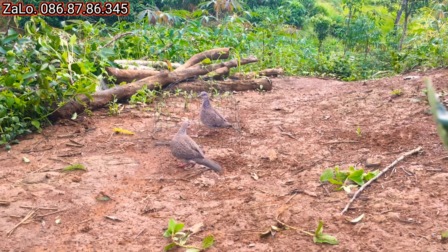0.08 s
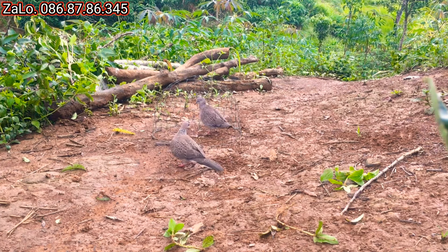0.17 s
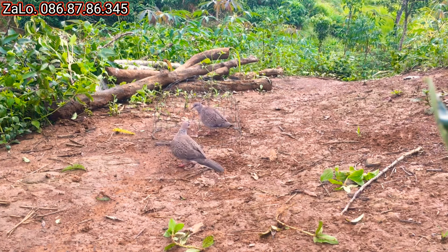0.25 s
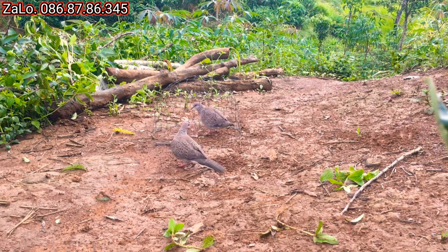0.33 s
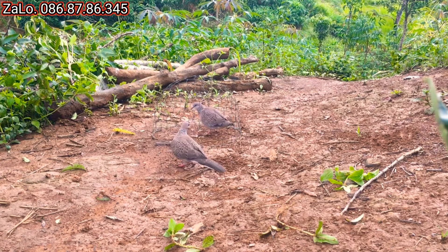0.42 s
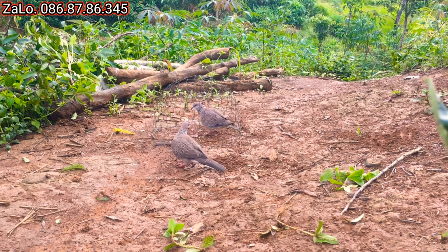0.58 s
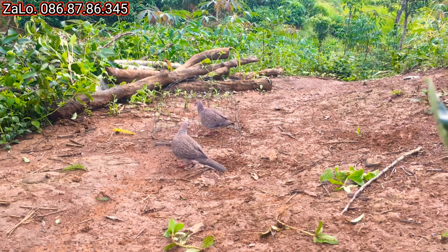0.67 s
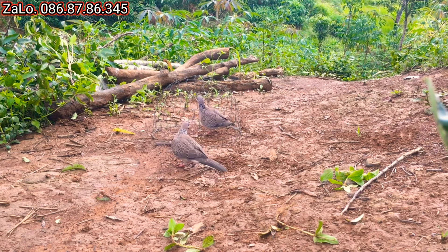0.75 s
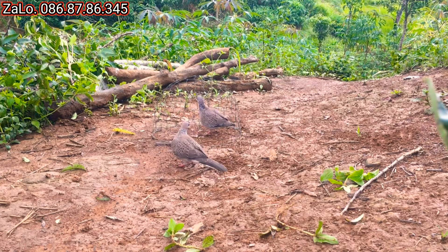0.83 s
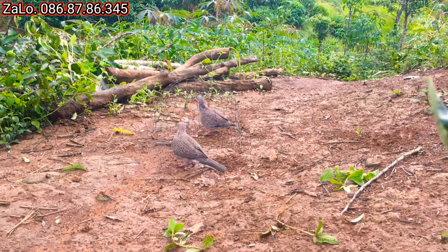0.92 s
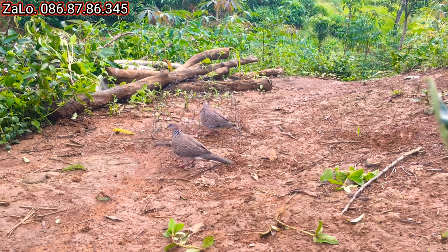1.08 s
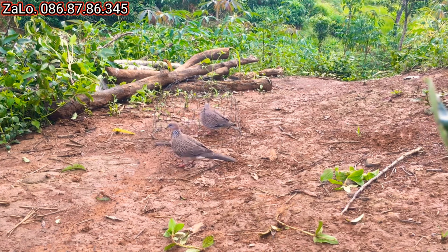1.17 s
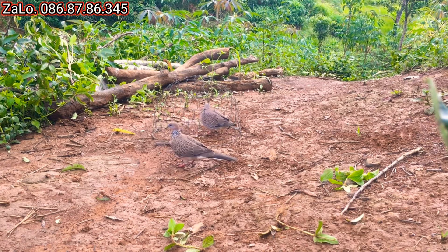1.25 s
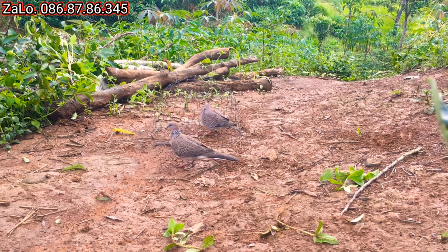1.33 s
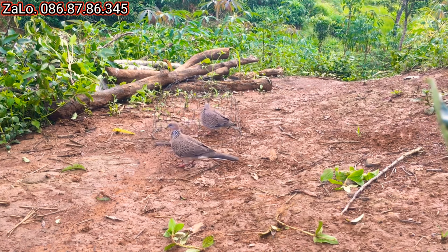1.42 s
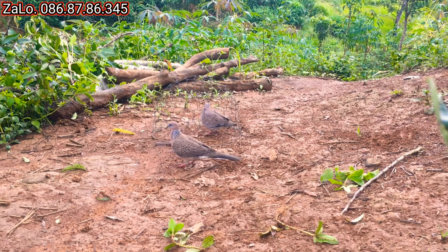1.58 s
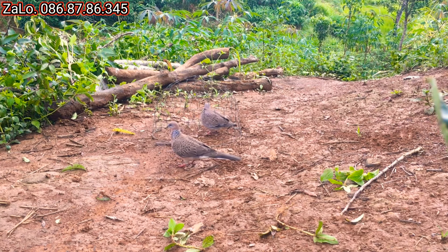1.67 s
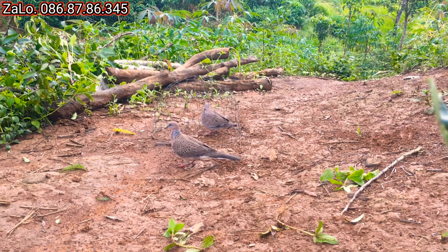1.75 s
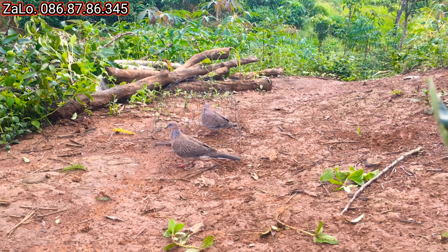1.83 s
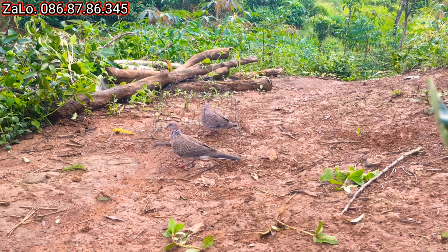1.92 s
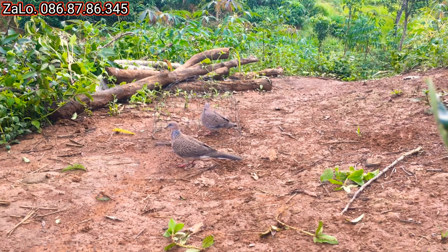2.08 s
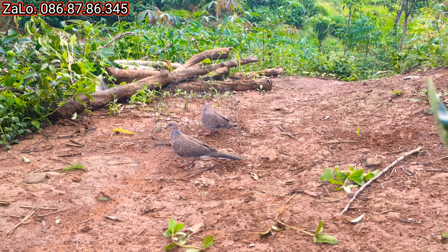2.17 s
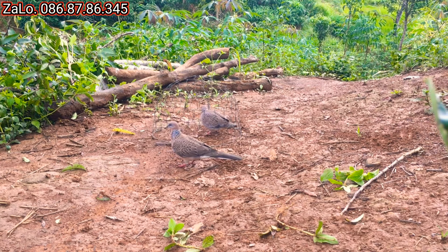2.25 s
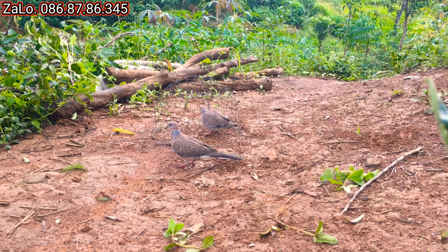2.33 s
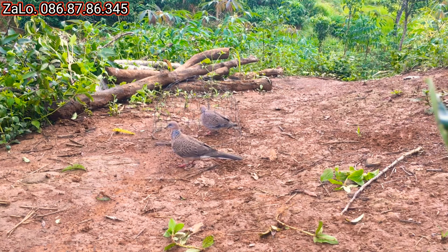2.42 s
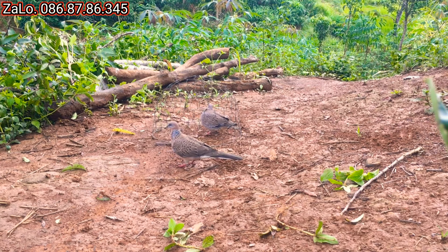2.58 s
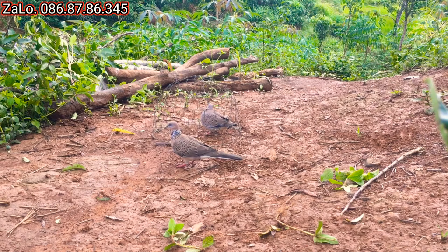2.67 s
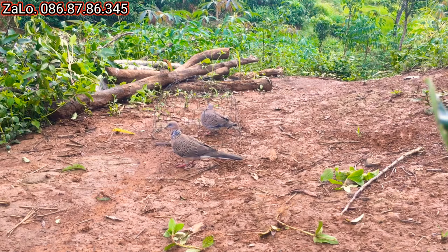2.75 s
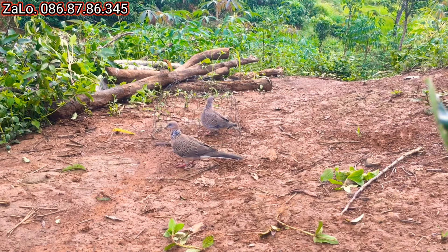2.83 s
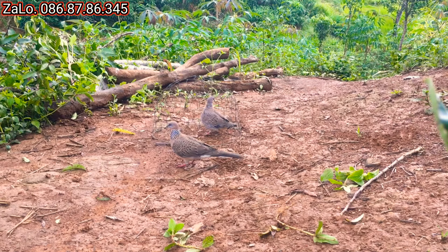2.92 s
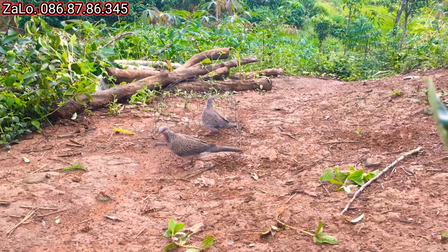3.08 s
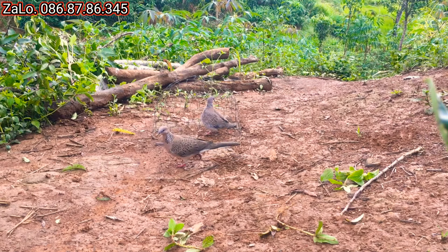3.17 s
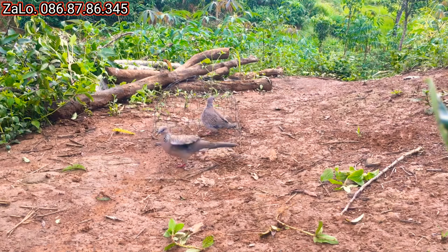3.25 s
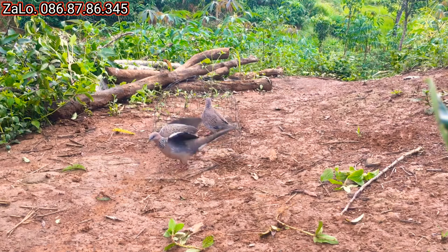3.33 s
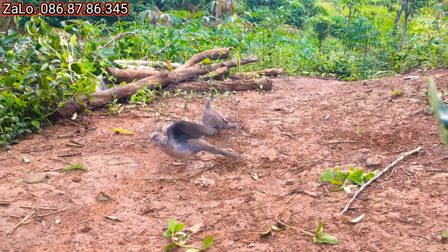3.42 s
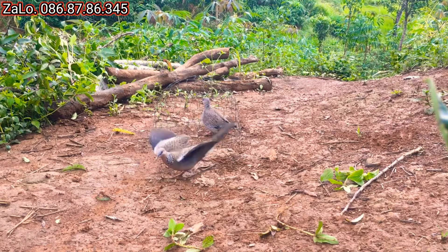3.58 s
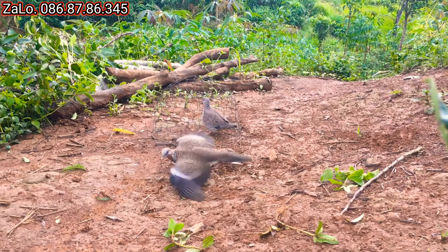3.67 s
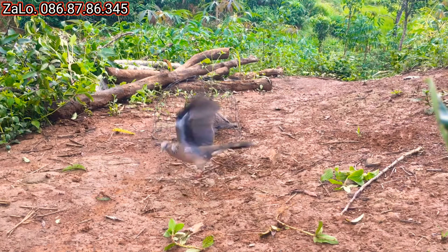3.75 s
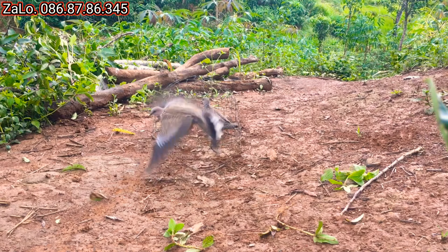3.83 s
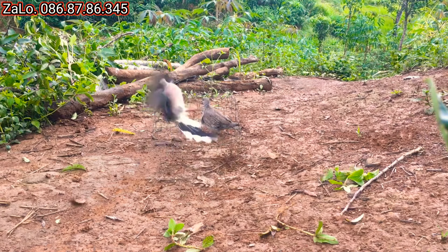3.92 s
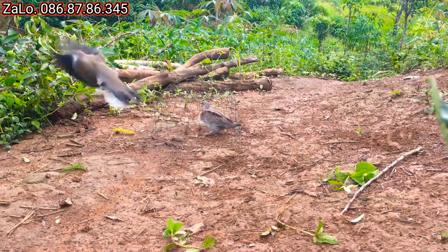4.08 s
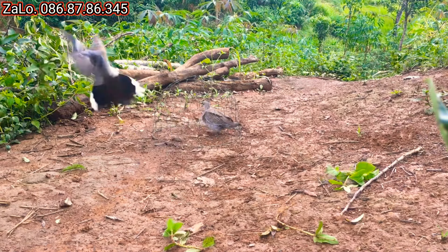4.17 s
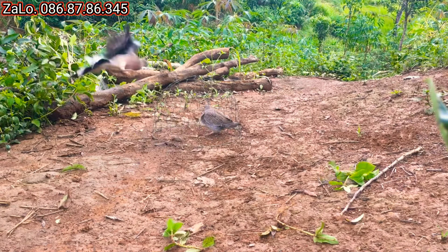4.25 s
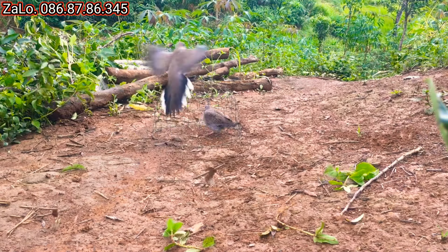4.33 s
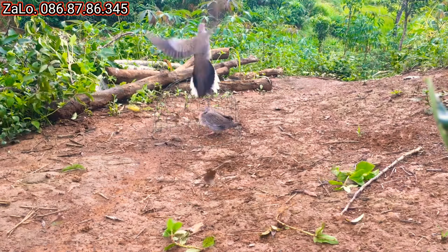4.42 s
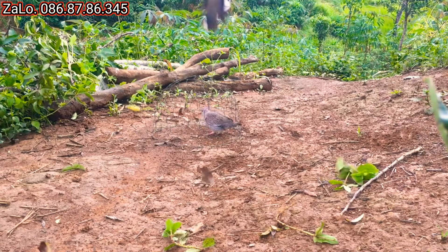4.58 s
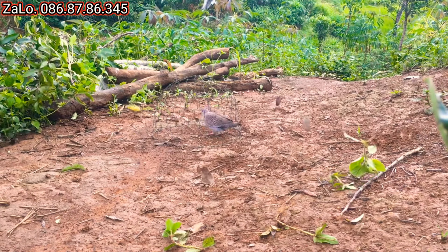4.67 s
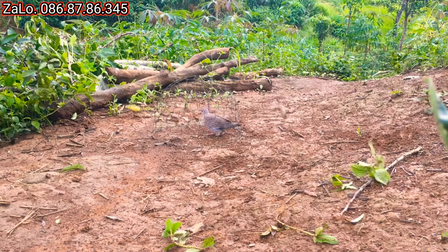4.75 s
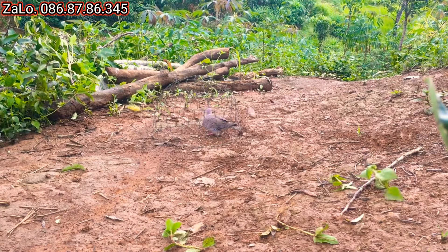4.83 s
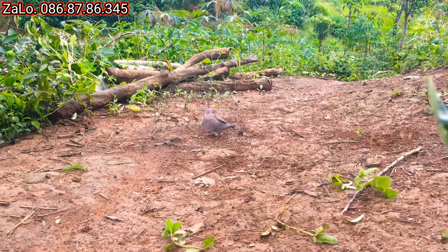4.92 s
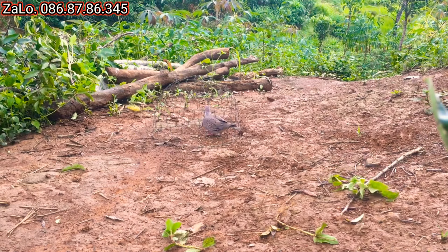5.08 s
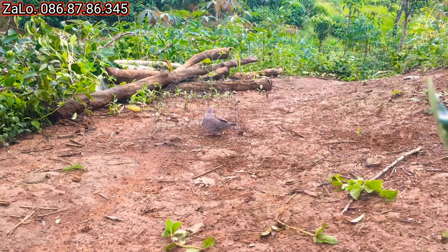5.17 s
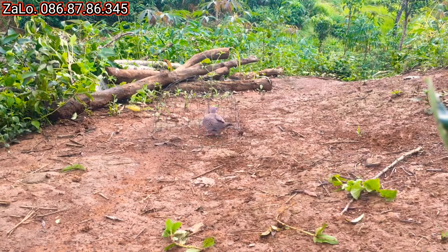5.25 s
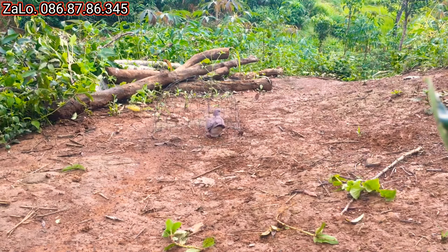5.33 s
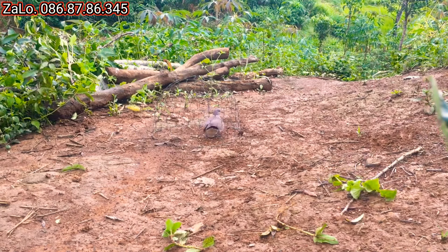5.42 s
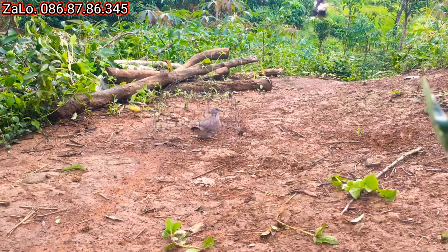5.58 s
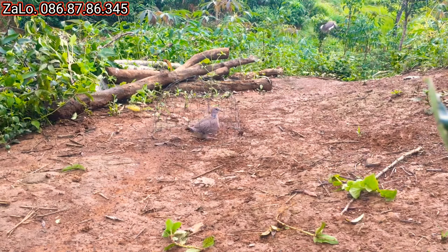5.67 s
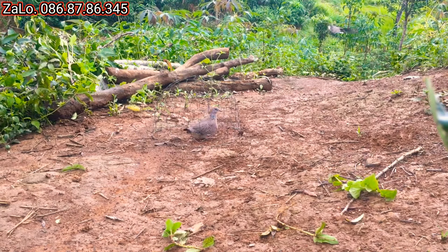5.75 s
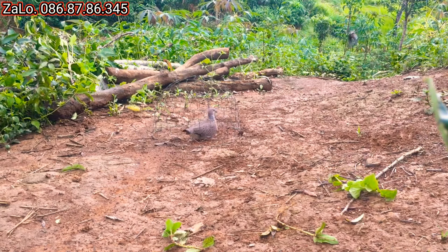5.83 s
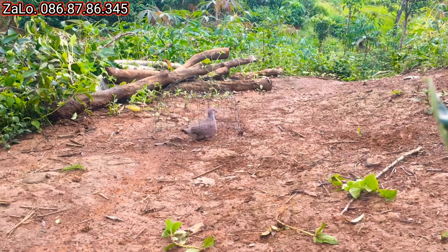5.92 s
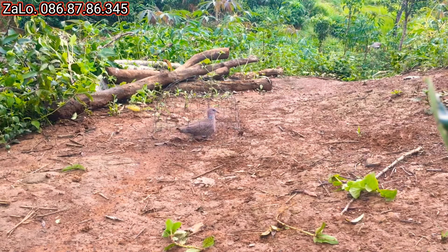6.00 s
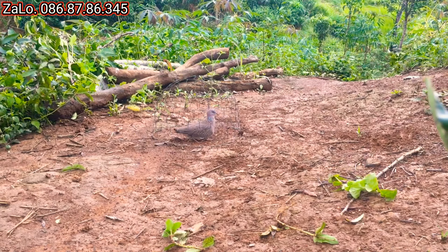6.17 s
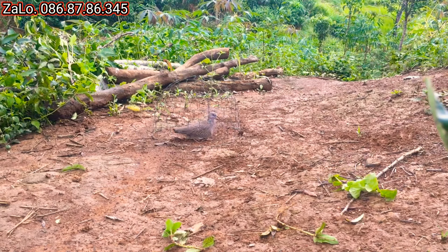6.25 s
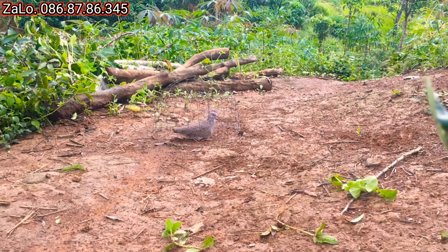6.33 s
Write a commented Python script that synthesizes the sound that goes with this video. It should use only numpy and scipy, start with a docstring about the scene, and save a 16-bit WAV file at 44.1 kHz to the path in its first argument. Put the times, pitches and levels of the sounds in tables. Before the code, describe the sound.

A dove bursts into flight close by with rapid, crisp wing claps and fluttering feathers, over a quiet outdoor hush with faint high bird chirps.

```python
"""Bare earth by bushes: a dove opens its wings, claps them and flies off past the microphone.
Each stroke is a noise snap of stiff feathers and a pulse of pushed air; tips buzz as gliding tones.
Filtered noise makes the rustle, brushed leaves, insects and outdoor hush; far birds are near-sine whistles.
A hollow knock, decaying modes struck by a scuffed blow, sounds as the dove leaves."""
import sys
import numpy as np
from scipy import signal
from scipy.fft import rfft, irfft, next_fast_len
from scipy.io import wavfile
from scipy.ndimage import uniform_filter1d, map_coordinates

SR = 44100
rng = np.random.default_rng(int(sys.argv[2]) if len(sys.argv) > 2 else 0)


def dump_mix(stems):
    """Bounce the given channels to the path in sys.argv[1] as a 16-bit WAV at rate SR."""
    frames = np.atleast_2d(stems).T  # one column per channel
    limited = np.clip(frames, -1, 1)  # hard clip at full scale
    pcm = np.round(limited * 32767).astype(np.int16)
    wavfile.write(sys.argv[1], SR, pcm)


N = 281843
TIME = np.arange(N) / SR


def from_db(db):
    """Amplitude ratio of a level in dB."""
    return 10 ** (np.asarray(db) / 20)


def rms_one(x):
    """Scale to rms 1."""
    return x / np.sqrt(np.mean(x ** 2) + 1e-20)


def burst(x):
    """Scale a short sound to the energy of 10 ms at rms 1."""
    return x * np.sqrt(.01 * SR / (np.sum(x ** 2) + 1e-20))


def in_time(rows, t=TIME):
    """Join the rows of a curve by straight lines."""
    s, *columns = np.transpose(rows)
    return [np.interp(t, s, c) for c in columns]


def add(out, start_s, x):
    """Mix x in at start_s."""
    i = int(start_s * SR)
    out[i:i + len(x)] += x[:len(out) - i]


def filtered(x, kind, order, hz):
    """Butterworth filter."""
    return signal.sosfilt(signal.butter(order, hz, kind, fs=SR, output="sos"), x)


def colour(x, points):
    """Causal (minimum-phase) filter with the given spectrum, falling steadily outside its points."""
    n = next_fast_len(len(x) + 2048) * 2
    hz, db = np.transpose(points)
    log_hz = np.log(np.fft.rfftfreq(n, 1 / SR) + 1)
    outside = np.abs(log_hz - np.clip(log_hz, np.log(hz[0]), np.log(hz[-1])))
    gain_db = np.interp(log_hz, np.log(hz), db) - 20 * outside
    # fold the cepstrum onto positive time: minimum phase
    cepstrum = irfft(np.log(from_db(gain_db)))
    cepstrum[1:n // 2] *= 2
    cepstrum[n // 2 + 1:] = 0
    response = np.exp(rfft(cepstrum))
    return irfft(rfft(x, n) * response)[:len(x)]


def noise(points):
    """Steady noise of a given colour, rms 1."""
    return rms_one(colour(rng.standard_normal(N), points))


def drift(rate_hz):
    """Slow chance with a spread near 1."""
    knots = rng.standard_normal(int(N / SR * rate_hz) + 2)
    return np.interp(TIME * rate_hz, np.arange(len(knots)), knots)


def grains(size, spread_db):
    """Dense tiny clicks of uneven strength."""
    return rng.standard_normal(size) * from_db(spread_db * rng.standard_normal(size))


def air_push(t, width_s, centre_s):
    """Suction then pressure as a surface sweeps by."""
    u = (t - centre_s) / width_s
    return burst(u * np.exp(-u * u / 2))


# nearness and effort of the flight: time_s, level_db
FLIGHT_LEVEL = [(3.83, -25), (3.87, -7), (3.99, -1), (4.09, -3.5), (4.23, -2.5), (4.45, -6.5), (4.62, -8),
                (4.85, -7), (5.1, -11), (5.38, -9), (5.62, -15.5), (6.39, -24)]


def flight_db(s):
    """Nearness and effort at time s."""
    return in_time(FLIGHT_LEVEL, s)[0]


def in_flight():
    """1 once the dove is in the air, 0 before."""
    return TIME > FLIGHT_LEVEL[0][0]


STROKES_PER_S = 26.5  # up- and downstrokes


def wingbeat():
    """Times of all strokes in the air: an even beat from each clap to the next."""
    claps = [s for s, *_ in WING_CLAPS if s > FLIGHT_LEVEL[0][0]]
    runs = []
    for a, b in zip(claps, claps[1:]):
        strokes = max(int(round((b - a) * STROKES_PER_S)), 0)
        runs.append(np.linspace(a, b, strokes, endpoint=False))
    return np.concatenate(runs + [claps[-1:]])


def away_from(times, rows):
    """The times that lie over half a stroke from every row."""
    return [s for s in times if min(abs(s - row[0]) for row in rows) > .5 / STROKES_PER_S]


# wing claps: start_s, contact_s, level_db, body_db (flat of the wing against edges), vane_ring_hz
WING_CLAPS = [(3.535, 0.0015, -35, -3.5, 1520), (3.777, 0.0038, -47.5, 7, 2150),
              (3.853, 0.0098, -41.5, 0.5, 1260), (3.891, 0.0058, -41, -1.5, 1200),
              (3.928, 0.0042, -38.5, 1, 1960), (3.9617, 0.0011, -40.5, -4, 2170),
              (4.001, 0.0067, -46, 4.5, 1310), (4.1552, 0.00067, -42.5, 0, 2340),
              (4.213, 0.0078, -40.5, -3.5, 2210), (4.2454, 0.002, -39.5, -9, 1990),
              (4.319, 0.00079, -22, -4.5, 2000), (4.3206, 0.0017, -28.5, 8, 2250),
              (4.338, 0.0012, -37.5, 2, 2430), (4.427, 0.0021, -29, -2, 1440),
              (4.496, 0.0065, -36, -0.5, 1330), (4.539, 0.0012, -40, -1, 1600),
              (4.577, 0.0011, -41.5, -1.5, 1290), (4.656, .0036, -42.5, 2, 1280),
              (4.6963, 0.0026, -40.5, -5.5, 3100), (4.7678, 0.0014, -42.5, -0.5, 1380),
              (4.823, 0.0032, -29.5, -10.5, 3320), (4.827, 0.0021, -30.5, -4.5, 2830),
              (4.8796, 0.0025, -34, 3.5, 3200), (4.923, 0.0047, -39, -1.5, 1280),
              (4.965, 0.0025, -46.5, 3.5, 1140), (5.009, 0.0038, -37.5, -2, 1310),
              (5.124, 0.003, -29.5, -1, 2527), (5.167, 0.0068, -42.5, -0.5, 1690),
              (5.1987, 0.0044, -35.5, -6.5, 2750), (5.281, 0.0042, -45.5, -4.5, 2600),
              (5.3528, 0.0026, -25.5, -9, 3250), (5.435, .002, -41, -10.5, 3280),
              (5.513, 0.0017, -38.5, -5, 2160), (5.558, 0.0032, -41, -12, 1380),
              (5.64, .0023, -47.5, -8, 2400), (5.757, 0.0031, -48, -3.5, 1110),
              (5.804, 0.0016, -44, -14, 1300), (5.837, 0.0041, -43, -11, 1400),
              (5.9195, 0.0025, -33.5, -14.5, 1280)]
# spectrum of the feather edges: freq_hz, density_db
EDGE_COLOUR = [(2800, -44), (4200, -12.5), (6000, -0.5), (8400, 3), (10300, -1.5), (16000, -4)]
# spectrum of the feather vanes: freq_hz, density_db
VANE_COLOUR = [(800, -13), (1400, 4), (2400, -2), (3500, 1.5), (4200, -5)]
# spectrum of the flat wing's slap: freq_hz, density_db
SLAP_COLOUR = [(130, -4.5), (250, 0.5), (630, 0.5), (950, 0.5), (1800, -27)]
# feather contact of a soft stroke at full effort
SOFT_DB, SOFT_BODY_DB, SOFT_CONTACT_S = -51.5, -1, 0.0029
SOFT_FOLLOWS = 0.7  # share of the flight's level swing


def soft_contacts(uneven_db=6.0, scatter_s=0.0036):
    """Strokes between claps: lighter feather contacts, uneven in time, length and level."""
    rows = []
    for s in away_from(wingbeat(), WING_CLAPS):
        start_s = s + scatter_s * rng.standard_normal()
        contact_s = SOFT_CONTACT_S * 2 ** rng.uniform(-1.2, 1)
        level_db = SOFT_DB + SOFT_FOLLOWS * flight_db(s) + uneven_db * rng.standard_normal()
        ring_hz = rng.choice([row[-1] for row in WING_CLAPS])
        rows.append((start_s, contact_s, level_db, SOFT_BODY_DB, ring_hz))
    return rows


def wing_snaps(edge_db=0.0, vane_db=-3.0, ring_db=-2.0, ring_width_hz=300, slap_db=-4.5,
               blow_share=0.13, shiver_db=1.0, shiver_s=0.0053):
    """Feathers hit in succession during contact, then shiver; the vane rings at a pitch set by its spread."""
    out, t = np.zeros(N), TIME[:SR // 16]
    for s, contact_s, level_db, body_db, ring_hz in WING_CLAPS + soft_contacts():
        touch = np.exp(-(t / contact_s) ** 4)
        shape = touch + from_db(shiver_db) * np.exp(-t / shiver_s)
        for points, db in ((EDGE_COLOUR, edge_db), (VANE_COLOUR, body_db + vane_db)):
            crackle = shape * grains(len(t), 2.3)
            add(out, s, from_db(level_db + db) * burst(colour(crackle, points)))
        # the flat of the wing lands at once
        blow = np.exp(-t / (blow_share * contact_s)) * (1 + .5 * rng.standard_normal(len(t)))
        add(out, s, from_db(level_db + body_db + slap_db) * burst(colour(blow, SLAP_COLOUR)))
        resonance = signal.iirpeak(ring_hz, ring_hz / ring_width_hz, fs=SR)
        ring = signal.lfilter(*resonance, touch * rng.standard_normal(len(t)))
        add(out, s, from_db(level_db + body_db + ring_db) * burst(ring))
    return out


# strong strokes without a clap, a thump of air: centre_s, half_width_s, level_db
AIR_THUMPS = [(3.972, 0.0032, -28.5), (4.043, 0.0034, -32), (4.081, 0.0011, -32), (4.124, 0.0026, -25.5),
              (4.148, 0.0013, -30.5), (4.737, 0.0019, -34), (4.811, .0014, -34)]
PUSH_FOLLOWS = 0.87  # share of the flight's level swing


def wing_air(push_db=-31.0, push_s=0.0018, lag_s=0.0066, uneven_db=3.5, squeeze_db=-5, width_ratio=0.53):
    """Strokes push air; a clap also squeezes out a pulse, the sharper the shorter the contact."""
    out, t = np.zeros(N), TIME[:SR // 12] - .02
    pushes = []
    for s in away_from(wingbeat() + lag_s, AIR_THUMPS):
        width_s = push_s * 2 ** rng.uniform(-0.71, 1.0)
        level_db = push_db + PUSH_FOLLOWS * flight_db(s) + uneven_db * rng.standard_normal()
        pushes.append((s, width_s, level_db))
    for s, width_s, level_db in AIR_THUMPS + pushes:
        add(out, s + t[0], from_db(level_db) * air_push(t, width_s, 0))
    for s, contact_s, level_db, body_db, _ in WING_CLAPS:
        width_s = width_ratio * contact_s
        squeeze = air_push(t, width_s, 0.0013 + 2 * width_s)
        add(out, s + t[0], from_db(level_db + body_db + squeeze_db) * squeeze)
    return filtered(out, "high", 3, 42)


# strokes whose tips buzz loudly: centre_s, level_db, pitch_hz, glide_per_s (share of the pitch)
LOUD_BUZZES = [(4.058, -27, 1126, -9), (4.1, -37.5, 1167, 16), (4.164, -30.5, 1280, -15),
               (4.452, -36, 1104, 5.5), (4.559, -32.5, 1063, -9.5), (4.791, -36.5, 1055, -14.5),
               (4.864, -29.5, 1050, -7.5), (4.946, -32, 1015, -4.5), (5.19, -35, 1038, 8.5),
               (5.736, -44, 1035, -6)]
FLUTTER_DB, FLUTTER_LEAD_S = -42, .017
FLUTTER_FOLLOWS = 0.19  # share of the flight's level swing
FLUTTER_HZ, FLUTTER_GLIDE_PER_S = 1088, 10  # typical pitch, spread of glides
SOFT_BUZZ_END_S = 5.42  # after this the weaker tip buzzes stop; only a listed one still sounds


def soft_buzzes(uneven_db=3, detune=0.127):
    """Weaker tip buzzes on the other strokes, uneven in level, pitch and glide."""
    rows = []
    for s in away_from(wingbeat()[1:] - FLUTTER_LEAD_S, LOUD_BUZZES):
        if s < SOFT_BUZZ_END_S:
            level_db = FLUTTER_DB + FLUTTER_FOLLOWS * flight_db(s) + uneven_db * rng.standard_normal()
            pitch_hz = FLUTTER_HZ * (1 + detune * rng.uniform(-0.935, 1))
            rows.append((s, level_db, pitch_hz, FLUTTER_GLIDE_PER_S * rng.standard_normal()))
    return rows


def feather_flutter(level_db=-0.5, rise_s=0.0039, fall_s=0.0076, overtone_db=-10, overtone_growth=0.56,
                    rough=0.46, waver=0.026):
    """A tip buzzes for some cycles, gliding with the wing's speed; a wider swing strengthens the overtones."""
    out, t = np.zeros(N), TIME[:SR // 20] - .025
    swing = np.exp(-(t / np.where(t < 0, rise_s, fall_s)) ** 2)
    loudest_db = max(row[1] for row in LOUD_BUZZES)
    for s, db, pitch_hz, glide_per_s in LOUD_BUZZES + soft_buzzes():
        wobble = rms_one(uniform_filter1d(rng.standard_normal((2, len(t))), size=90))
        tip_hz = pitch_hz * (1 + glide_per_s * t + waver * wobble[0])
        phase = 2 * np.pi * np.cumsum(tip_hz) / SR
        overtone = from_db(overtone_db + overtone_growth * (db - loudest_db)) * swing
        tone = sum(overtone ** k * np.sin((k + 1) * phase) for k in range(3))
        tone = tone * (1 + rough * wobble[1])
        add(out, s + t[0], from_db(db + level_db) * tone * swing)
    return out


# spectrum of sliding feathers and barb ticks: freq_hz, density_db
RUSTLE_COLOUR = [(1500, -15), (2800, -4), (4200, -6), (9000, -3.5), (12500, -9.5), (16000, -15)]


def barb_ticks(level_db=-48.0, per_s=260, fade_s=0.00057):
    """In flight the feather edges catch on each other in small bright ticks at random times."""
    ticks = (rng.random(N) < per_s / SR) * rng.random(N) ** 2
    envelope = signal.lfilter([1], [1, -np.exp(-1 / (fade_s * SR))], ticks + 1e-18)
    crackle = rms_one(colour(envelope * rng.standard_normal(N), RUSTLE_COLOUR))
    return from_db(level_db + flight_db(TIME)) * in_flight() * crackle


# spectrum of the eddies: freq_hz, density_db
SWISH_COLOUR = [(180, -5), (330, 1.5), (700, 3), (1150, -1), (1800, 1), (3200, -16), (4500, -22)]
# spectrum of the low wake: freq_hz, density_db
WAKE_COLOUR = [(25, -16), (48, 5.5), (75, -6.5), (150, -6), (280, -16.5), (600, -37.5)]


def stirred_air(rustle_db=-48.0, swish_db=-45, wake_db=-39.0, beat_db=1.0):
    """Feathers slide over each other, most at each stroke, and shed eddies while the dove is in the air."""
    effort = from_db(flight_db(TIME)) * in_flight()
    beats = wingbeat()
    stroke = np.cos(2 * np.pi * np.interp(TIME, beats, np.arange(len(beats))))
    sliding_db = rustle_db + beat_db * stroke + 2 * drift(130)
    sliding = rms_one(colour(grains(N, 4.5), RUSTLE_COLOUR)) * from_db(sliding_db)
    eddies = noise(SWISH_COLOUR) * from_db(swish_db + 4.5 * drift(110))
    wake = from_db(wake_db) * filtered(noise(WAKE_COLOUR), "high", 4, 33)
    return effort * (sliding + eddies + wake)


# lag of the ground's reflection as the dove climbs: time_s, lag_ms
GROUND_LAG_MS = [(3.8, 0.31), (4.32, .42), (4.7, 0.65), (4.83, 0.85)]


def over_ground(x, echo_db=-7):
    """Rough earth reflects the wings dully; the growing lag sweeps notches down through the sound."""
    lag_samples = in_time(GROUND_LAG_MS)[0] * SR / 1000
    dull = uniform_filter1d(x, size=5)
    echo = map_coordinates(dull, [np.arange(N) - lag_samples], order=1)
    return x + from_db(echo_db) * echo


# feathers and leaves brushed: peak_s, fade_s, level_db
BRUSH_TOUCHES = [(3.393, .004, -45.5), (3.758, 0.012, -43), (3.785, 0.014, -35), (3.989, 0.03, -36.5),
                 (6.054, 0.022, -44.5), (6.159, 0.042, -43), (6.25, 0.055, -49)]
# spectrum of the brushing: freq_hz, density_db
LEAF_COLOUR = [(200, 4), (600, 1.5), (2200, -1), (4500, -5.5), (11000, -1.5), (16000, -10)]


def brushing(swell_share=0.3):
    """Brushed feathers and leaves swell, crackle and settle."""
    level = np.zeros(N)
    for s, fade_s, db in BRUSH_TOUCHES:
        distance_s = np.maximum((s - TIME) / swell_share, TIME - s)
        level += from_db(db) * np.exp(-distance_s / fade_s)
    crackle = grains(N, 4.5) * from_db(3.0 * drift(450))
    return level * rms_one(colour(crackle, LEAF_COLOUR))


def receding(x, dull_hz=9500):
    """The top fades as the dove leaves the microphone's axis."""
    dull = filtered(x, "low", 1, dull_hz)
    return x + np.interp(TIME, [4.8, 5.7], [0, 1]) * (dull - x)


# hollow knock, first touches and main blow: start_s, level_db
KNOCK_BLOWS = [(5.453, -41.5), (5.465, -47), (5.477, -30.5)]
# resonances of the hollow body: freq_hz, width_hz, level_db
HOLLOW_MODES = [(338, 52, -8), (470, 61, -4), (700, 170, -5.5), (887, 110, 2.5), (1290, 320, -11)]


def knock(contact_s=0.0061, scuff=0.22, sag_per_s=6):
    """A blow with a short scuff rings a hollow body, whose pitch sags as it dies away."""
    out, t = np.zeros(N), TIME[:SR // 8]
    for s, db in KNOCK_BLOWS:
        force = (t == 0) + scuff * rng.standard_normal(len(t)) * np.exp(-t / contact_s)
        for k, (hz, width_hz, mode_db) in enumerate(HOLLOW_MODES):
            phase = 2 * np.pi * np.cumsum(hz * np.exp(-sag_per_s * t)) / SR
            ring = np.exp(-np.pi * width_hz * t) * np.sin(phase)
            struck = burst(signal.fftconvolve(force, ring)[:len(t)])
            add(out, s, (-1) ** k * from_db(db + mode_db) * struck)
    return out


# high falling chirp, shape: offset_s, pitch_hz, level_db
HIGH_SHAPE = [(0, 7440, -9), (.006, 5990, 2), (.016, 5050, -3), (.035, 4310, -8), (.052, 4000, -6),
              (.064, 3090, -3)]
# its calls: start_s, level_db
HIGH_TIMES = [(.470, -42.5), (1.272, -41), (2.264, -44), (3.058, -42), (4.271, -45)]
# lower chirp, shape: offset_s, pitch_hz, level_db
LOW_SHAPE = [(0, 3540, 7), (.01, 3650, 7), (.02, 3390, 8.5), (.032, 2970, 4), (.045, 2720, 4),
             (.055, 2500, -11)]
# its calls: start_s, level_db
LOW_TIMES = [(.4, -62.5), (0.859, -57.5), (1.237, -58), (1.628, -61), (2.108, -57), (2.556, -52),
             (3.040, -53.5), (3.462, -54), (3.878, -52.5), (4.278, -55), (5.388, -59)]
# thin falling call, shape: offset_s, pitch_hz, level_db
TSIP_SHAPE = [(0, 4330, 1), (.012, 3830, -9), (.028, 3200, -8)]
# its calls: start_s, level_db
TSIP_TIMES = [(.095, -51), (1.525, -53), (1.885, -51)]
# faint far peep, shape: offset_s, pitch_hz, level_db
PEEP_SHAPE = [(0, 2560, 16.5), (.02, 2717, 10.5), (.05, 2620, -21)]
# its calls: start_s, level_db
PEEP_TIMES = [(.179, -65.5), (.62, -70), (3.586, -64.5)]
# faint far twitter, shape: offset_s, pitch_hz, level_db
TWITTER_SHAPE = [(0, 5200, -9), (.02, 5740, -0.5), (.045, 5350, 0)]
# its calls: start_s
TWITTER_TIMES = [.865, 1.18, 1.39, 1.489, 1.585, 3.566, 3.8, 6.31]
# thin, nearly level far whistle, shape: offset_s, pitch_hz, level_db
WHISTLE_SHAPE = [(0, 5280, 0), (.1, 5130, -1)]
# its calls: start_s, level_db
WHISTLE_TIMES = [(.9, -61), (1.07, -63)]


def chirps(shape, calls, waver=0.01):
    """A near-sine whistle that wavers a little differently each time."""
    out, t = np.zeros(N), TIME[:int(shape[-1][0] * SR)]
    pitch_hz, shape_db = in_time(shape, t)
    fade = signal.windows.hann(len(t)) ** (1 / 4)
    for s, call_db in calls:
        wobble = rms_one(uniform_filter1d(rng.standard_normal(len(t)), size=70))
        phase = 2 * np.pi * np.cumsum(pitch_hz * (1 + waver * wobble)) / SR
        add(out, s, from_db(shape_db + call_db) * np.sin(phase) * fade)
    return out


# level of a distant trilling bird: time_s, level_db
TRILL_LEVEL = [(.8, -67), (1.02, -54), (1.6, -61.5), (2.7, -59), (3.7, -53.5), (6.39, -65.5)]


def trill(notes_per_s=25.5, centre_hz=3190, fall=0.198):
    """A run of short falling notes, uneven in pace and strength."""
    note = np.cumsum(notes_per_s * (1 + 0.12 * drift(15))) / SR % 1
    pitch_hz = centre_hz * (1 + fall * (.5 - note) + 0.0121 * drift(20))
    phase = 2 * np.pi * np.cumsum(pitch_hz) / SR
    level = from_db(in_time(TRILL_LEVEL)[0] + 3.8 * drift(7))
    return level * np.sin(np.pi * note) ** 3 * np.sin(phase)


def far_birds(twitter_db=-59):
    """Small birds whistle near-sine tones: chirps, a trill and thin calls."""
    twitters = [(s, twitter_db + 2 * rng.standard_normal()) for s in TWITTER_TIMES]
    birds = chirps(HIGH_SHAPE, HIGH_TIMES) + chirps(LOW_SHAPE, LOW_TIMES) + trill()
    birds += chirps(TSIP_SHAPE, TSIP_TIMES) + chirps(PEEP_SHAPE, PEEP_TIMES)
    return birds + chirps(TWITTER_SHAPE, twitters) + chirps(WHISTLE_SHAPE, WHISTLE_TIMES)


def outdoors(x, wet_db, t60_s):
    """Ground and foliage scatter a thin, short tail."""
    t = TIME[:SR // 2]
    scatter = grains(len(t), 3.4) * from_db(-60 * t / t60_s) * (t > .004)
    scatter /= np.sqrt(np.sum(scatter ** 2))
    return x + from_db(wet_db) * signal.fftconvolve(x, scatter)[:N]


# puffs of breeze on the microphone: centre_s, level_db
BREEZE_PUFFS = [(0.042, -36), (0.112, -38.5), (0.131, -42), (.325, -41.5)]


def breeze(width_s=0.0043):
    """Slow lumps of air on the microphone."""
    lumps = sum(from_db(db) * air_push(TIME, width_s, s) for s, db in BREEZE_PUFFS)
    return filtered(lumps + 1e-18, "high", 2, 35)


# spectrum of the insects: freq_hz, density_db
INSECT_COLOUR = [(3700, -29.5), (4300, -11), (4650, -6), (4900, -16), (5400, -27.5)]


def insects(level_db=-61.5):
    """Insects as a narrow band of noise of drifting level."""
    return from_db(level_db + 1.3 * drift(40)) * noise(INSECT_COLOUR)


# spectrum of the outdoor hush: freq_hz, density_db
HUSH_COLOUR = [(20, -19), (60, -2), (190, -0.5), (500, -8.5), (900, -11), (1170, -9), (1450, -11.5),
               (2300, -13.5), (3800, -21.5), (5500, -18.5), (9000, -25), (11000, -31), (15500, -31)]


def hush(level_db=-54.5):
    """Soft outdoor hush: steady coloured noise."""
    return from_db(level_db) * noise(HUSH_COLOUR)


def scene():
    """The dove is near; the other birds and the knock come through the foliage."""
    feathers = outdoors(wing_snaps() + barb_ticks(), wet_db=-19.5, t60_s=0.25) + stirred_air()
    dove = over_ground(feathers) + feather_flutter() + wing_air()
    near = receding(dove + brushing())
    far = outdoors(knock(), wet_db=-14.0, t60_s=0.12) + outdoors(far_birds(), wet_db=-4.5, t60_s=0.25)
    return (near + far + breeze() + insects() + hush())[None]


def record(dry, cutoff_hz=15500):
    """The top is cut steeply."""
    return signal.sosfilt(signal.ellip(10, .1, 80, cutoff_hz, fs=SR, output="sos"), dry)


dry = scene()
out = record(dry)
dump_mix(out)
```